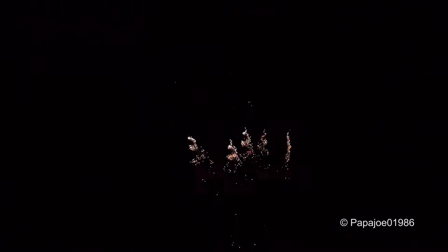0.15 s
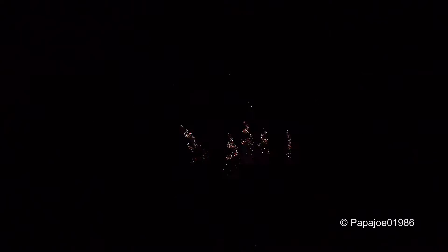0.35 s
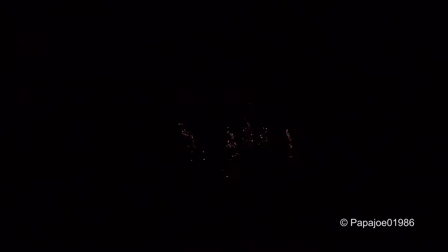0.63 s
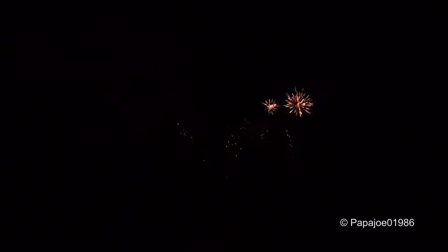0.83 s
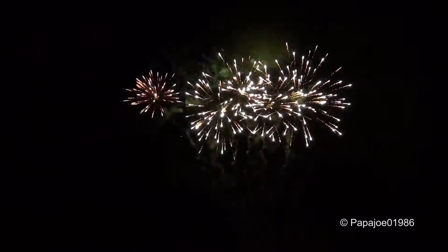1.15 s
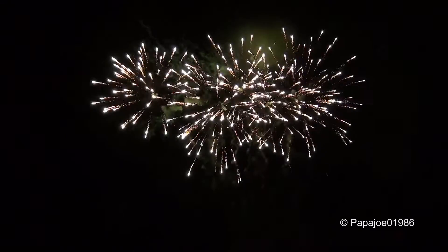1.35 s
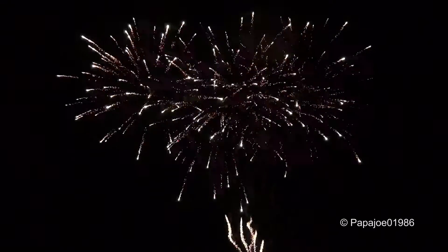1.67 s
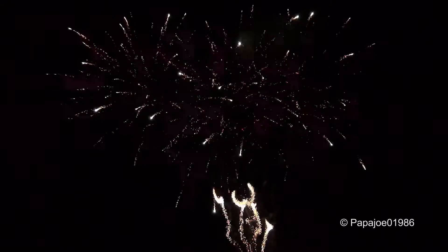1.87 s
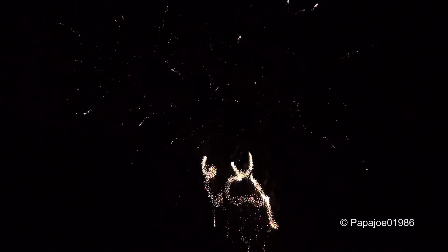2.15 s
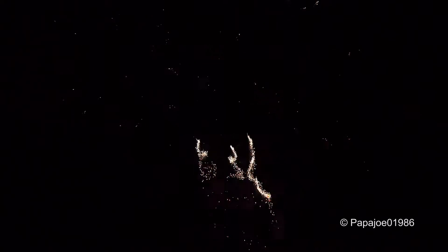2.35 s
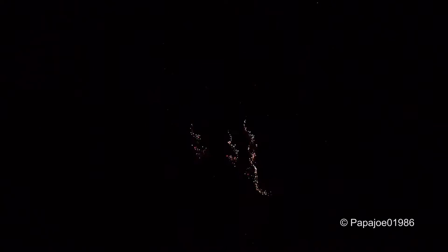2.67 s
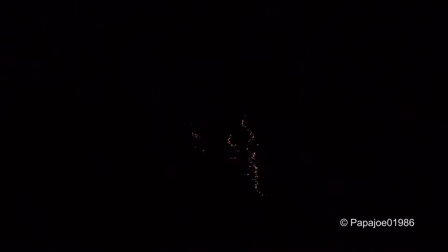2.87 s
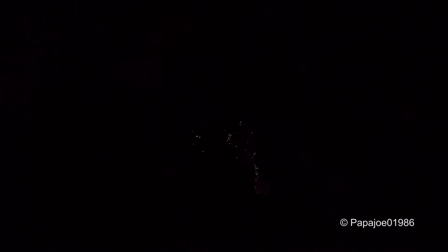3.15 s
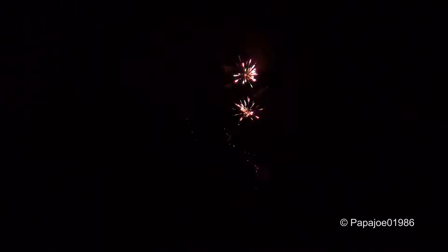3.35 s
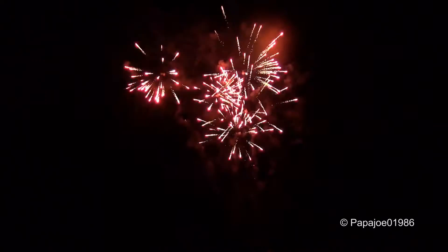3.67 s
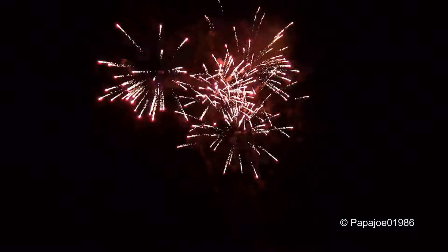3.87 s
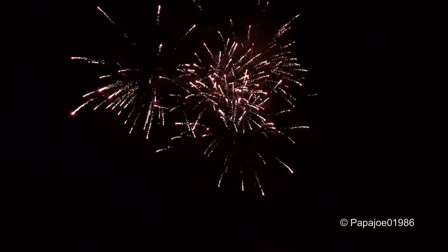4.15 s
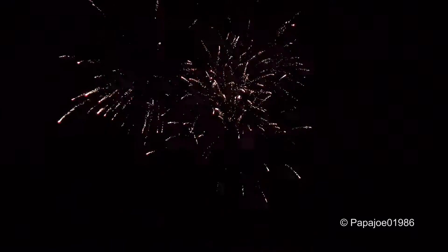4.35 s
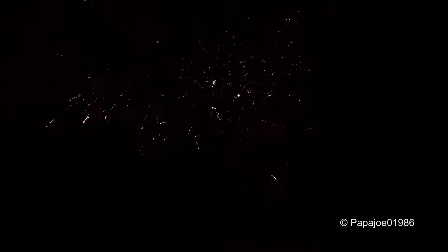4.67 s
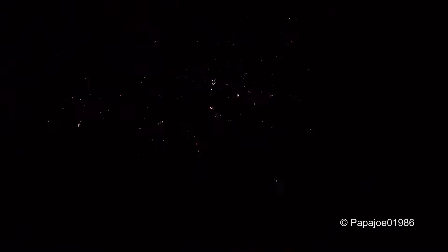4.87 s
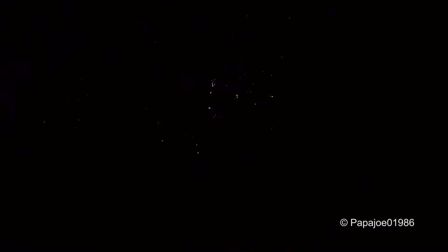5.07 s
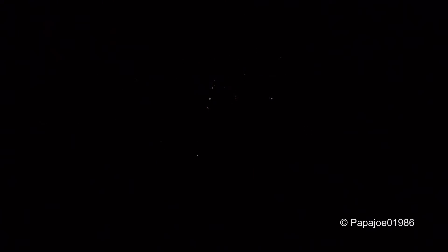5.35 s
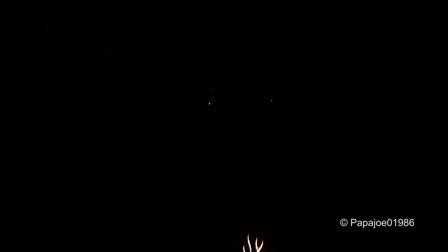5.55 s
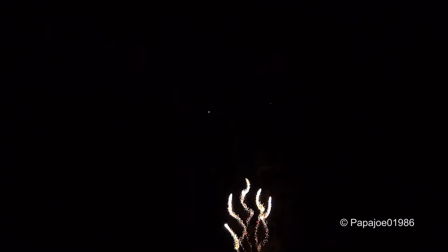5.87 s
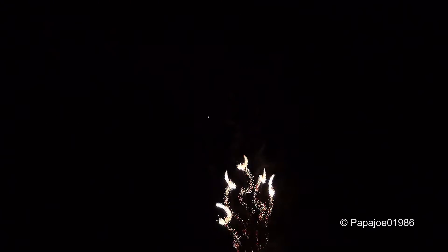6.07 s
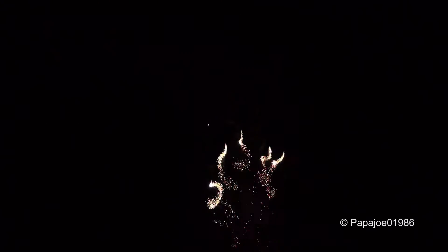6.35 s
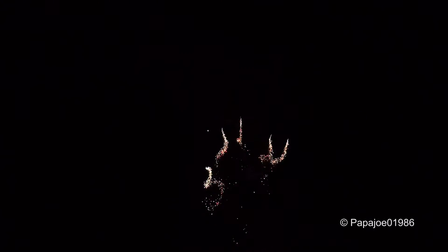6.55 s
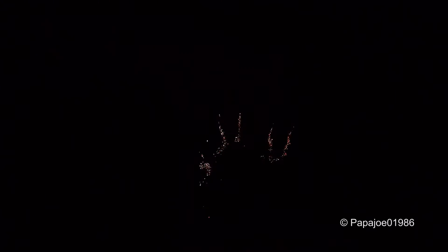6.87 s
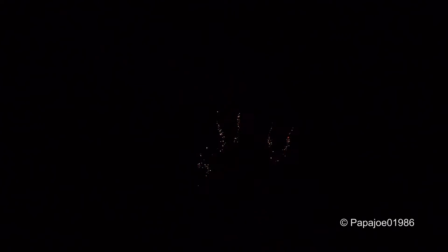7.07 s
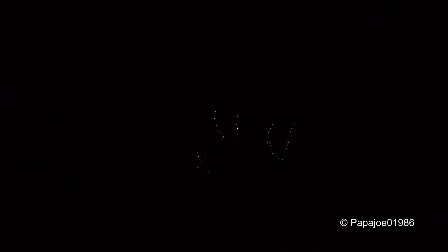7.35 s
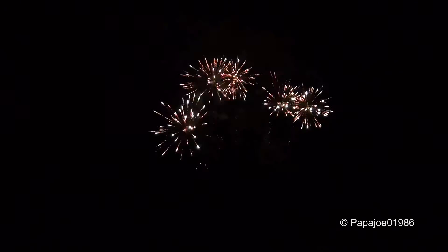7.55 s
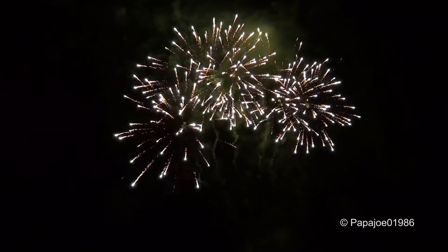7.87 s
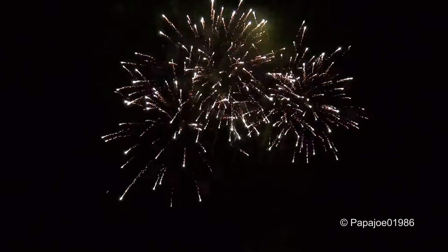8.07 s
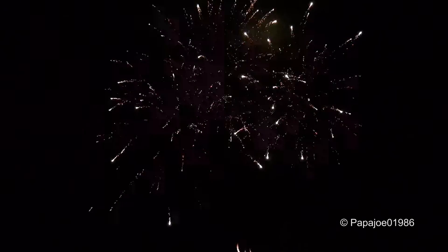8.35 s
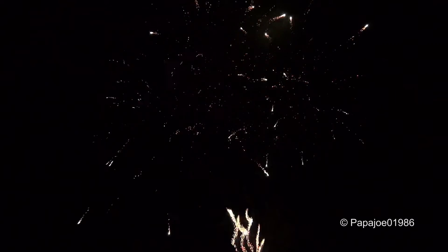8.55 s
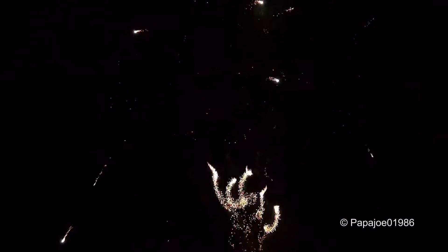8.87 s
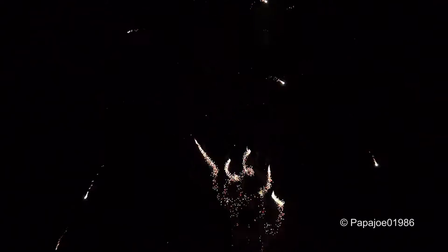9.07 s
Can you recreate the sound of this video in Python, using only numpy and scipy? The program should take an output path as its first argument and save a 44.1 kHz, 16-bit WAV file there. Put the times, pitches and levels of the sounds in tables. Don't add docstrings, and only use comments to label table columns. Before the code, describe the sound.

Outdoors among houses at night, wind rumbles on a single microphone while an earlier volley's echoes fade. Five shells crack in a tight cluster, quick launch thumps follow, then another burst volley, more thumps, a third set of bangs and final thumps. Each rolls back as roar, dull pops and hiss, with small debris ticks; the loud shots overload and briefly duck the background.

```python
import sys
import numpy as np
from scipy import signal
from scipy.io import wavfile
from scipy.ndimage import uniform_filter1d

SR = 44100
rng = np.random.default_rng(int(sys.argv[2]) if len(sys.argv) > 2 else 0)


def attenuation_scalar(level_db):
    decades = np.asarray(level_db, float) / 20
    return 10 ** decades


def wav_out(sig):
    wavfile.write(sys.argv[1], SR, np.round(np.clip(np.atleast_2d(sig).T, -1, 1) * 32767).astype(np.int16))


N = 406161
TIME = np.arange(N) / SR

# start_s [s], overdrive_db [dB], ground_bounce_ms [ms]
BURSTS = [(1.2315, 9, 4.5), (1.2328, 13, 4.4), (1.2936, 14, 4.4), (1.3118, 12, 4.7), (1.4095, 13, 4.7),
          (3.6742, 14, 5.2), (3.7089, 14, 4.4), (3.8065, 0, .4), (3.8454, 12, 5.1), (3.8776, 14, 3.6),
          (3.8824, 7, 2.8), (7.7638, 14, 4.0), (7.8189, 15, 4.8), (7.8458, 11, 4.9), (7.8507, 11, 4.4)]
# start_s [s], overdrive_db [dB], crack_db [dB]
LIFTS = [(1.7173, 1, -12), (1.7403, -3, -24), (1.7647, -1, -17), (1.7821, -2, -22), (1.8131, -2, -20),
         (5.7304, -2, -19), (5.7474, -2, -19), (5.7642, -1, -14), (5.7855, -1, -22), (5.8110, -2, -18),
         (8.5781, 0, -10), (8.5978, 0, -14), (8.6174, 1, -6), (8.6434, 1, -6), (8.6596, -1, -10)]


def unit(x):
    return x / np.sqrt(np.mean(x ** 2) + 1e-20)


def drift(rate):
    pole = np.exp(-2 * np.pi * 20 * rate / SR)
    noise = rng.standard_normal(N // 20 + 3002)
    slow = signal.lfilter([1], [1, -2 * pole, pole * pole], noise)[3000:]
    return np.interp(np.arange(N) / 20, np.arange(len(slow)), unit(slow))


def band(x, low_hz, high_hz):
    sos = signal.butter(2, [low_hz, min(high_hz, .45 * SR)], "band", fs=SR, output="sos")
    return signal.sosfilt(sos, x)


def bank(spectrum, source, patchy_db, rate):
    hz, db = np.transpose([point for point in spectrum if point[1] > -55])
    edges = hz[0] * 2 ** np.arange(0, np.log2(hz[-1] / hz[0]) + .2, 1 / 3)
    out = 0
    for k, (low, high) in enumerate(zip(edges, edges[1:])):
        level_db = np.interp(np.log(low * high) / 2, np.log(hz), db)
        flicker = 3.5 + patchy_db / 9 * drift(rate)
        out = out + attenuation_scalar(level_db) * flicker * band(source[k % 2], low, high)
    return unit(out)


def scatter(per_s, spread_db, smooth):
    clicks = (rng.random((2, N)) < per_s / SR) * rng.choice([-1, 1], (2, N))
    sizes = attenuation_scalar(spread_db * np.minimum(rng.exponential(1, (2, N)), 4))
    return unit(clicks * sizes) + smooth * rng.standard_normal((2, N))


def add(out, s, pulse):
    i = round(s * SR)
    out[i:i + len(pulse)] += pulse[:N - i]


def shock(swing_hz, decay_s, lead):
    t = TIME[:1400]
    return -np.cos(2 * np.pi * swing_hz * t + lead) * np.exp(-t / decay_s)


def roll(t):
    # start_s [s], level_db [dB]
    roar_tables = [
        [(0, -33.5), (.3, -32), (.52, -41), (.68, -38.5), (1.07, -43.5), (1.228, -39)],
        [(1.24, -21.5), (1.4, -20.5), (1.62, -26), (1.9, -26.5), (2.25, -24.5), (2.4, -26.5), (3.1, -25),
         (3.25, -31.5), (3.67, -34.5)],
        [(3.69, -26), (3.73, -19), (4.02, -17.5), (4.07, -23), (4.27, -26), (4.65, -21.5), (4.78, -24.5),
         (5.2, -28), (5.725, -31.5)],
        [(5.74, -31), (5.93, -45.5), (6.08, -37.5), (6.3, -33), (6.76, -33.5), (7.03, -40), (7.3, -38.5),
         (7.55, -39), (7.76, -45.5)],
        [(7.772, -33), (7.81, -18.5), (7.93, -17.5), (8.1, -28), (8.3, -27.5), (8.52, -26.5), (8.82, -26.5),
         (9.0, -32), (9.21, -24.5)],
    ]
    last_shot_s = np.array([-.65, 1.41, 3.88, 5.81, 7.85])
    s, db = np.transpose(sum(map(list, roar_tables), []))
    volley = np.searchsorted([rows[0][0] for rows in roar_tables], t, "right") - 1
    return np.interp(t, s, db), np.maximum(t - last_shot_s[volley], 0), volley


def levels():
    # start_s [s], level_db [dB]
    gust_levels = [(0.0, -5), (0.1, -9.5), (1.2, -10.5), (1.33, -18), (2.49, -13.5), (3.23, -10.5),
                   (3.39, -9), (3.9, -14.5), (4.1, -10.5), (4.21, -13.5), (6.64, -7.5), (6.69, -9.5),
                   (6.8, -13), (7.67, -3.5), (7.77, -5), (8.03, -7.5), (9.11, -9), (9.21, -12)]
    # fresh_db [dB], loss_db_per_s [dB/s]
    absorption = [
        (-6.5, 5),
        (-10.5, 22),
    ]
    # loudest_s [s], spark_db [dB], swell_db_per_s [dB/s]
    comet_tails = [(0, -41, 30.), (.28, -48.5, 49), (2.36, -35.5, 39), (6.1, -41.5, 68), (6.31, -33.5, 72),
                   (6.76, -45, 58), (8.96, -34.5, 147), (9.1, -36.5, 60.)]
    boom_db, boom_loss_db_per_s = np.array([-34.5, -15, -15.5, -24, -15]), 11.5
    flash_db, flash_s = [-14.5, -23, -30.5, -36.5], 0.031
    burn_out_db_per_s = 47.5

    t = TIME[::32]
    roar_db, age_s, volley = roll(t)
    over_db = roar_db + 21
    wind_gain = attenuation_scalar(np.interp(t, *np.transpose(gust_levels)) + 2 - 1.1 * np.maximum(over_db, 0))
    boom_power = attenuation_scalar(boom_db[volley] - boom_loss_db_per_s * age_s + 0.19 * over_db) ** 2
    sizzle_power, spark_power = [attenuation_scalar(roar_db + db - loss * age_s) ** 2 for db, loss in absorption]
    flash = np.max([(t > s) * np.exp(-np.abs(t - s) / flash_s) for s, _, _ in LIFTS], axis=0)
    comet_power = 0
    for s, db, swell in comet_tails:
        fall_db = np.maximum(swell * (s - t), burn_out_db_per_s * (t - s))
        comet_power = comet_power + attenuation_scalar(db - fall_db) ** 2
    power = [boom_power + (attenuation_scalar(-25) * wind_gain) ** 2,
             attenuation_scalar(roar_db) ** 2,
             sizzle_power + attenuation_scalar(0.5) ** 2 * comet_power,
             spark_power + comet_power + attenuation_scalar(-70) ** 2]
    echo = [np.sqrt(p + attenuation_scalar(db) ** 2 * flash) for p, db in zip(power, flash_db)]
    air_gain = attenuation_scalar(-54.5) * (echo[3] / attenuation_scalar(-35.5)) ** 1.6
    return [np.interp(TIME, t, gain) for gain in (wind_gain, *echo, air_gain)]


def wind():
    # pitch_hz [Hz], level_db [dB per Hz]
    wind_spectrum = [(7.1, -39), (12, 0), (38, 2.5), (140, -10), (225, -19), (298, -56.5), (357, -62),
                     (420, -53), (550, -57), (920, -120)]
    rumble = bank(wind_spectrum, rng.standard_normal((2, N)), patchy_db=5.0, rate=1.8)
    return rumble / np.sqrt(uniform_filter1d(rumble ** 2, size=4000) + .1) ** .5


def boom(lumps, echoes):
    # pitch_hz [Hz], level_db [dB per Hz]
    boom_spectrum = [(100, -40), (170, 2), (286, 2.5), (382, -4), (470, -12.5), (610, -26.5), (1030, -120)]
    return attenuation_scalar(0.32 * lumps) * bank(boom_spectrum, echoes, patchy_db=5.5, rate=10.0)


def roar(lumps, echoes):
    # pitch_hz [Hz], level_db [dB per Hz]
    roar_spectrum = [(250, -48.5), (430, -7), (521, 5), (579, -1.5), (774, -3), (1140, -2), (1600, -12.5),
                     (2080, -9.5), (3520, -120)]
    # pitch_hz [Hz], width_hz [Hz], level_db [dB]
    railing_bands = [
        (966, 210, -16.5),
        (2002, 250, -16),
    ]
    out = attenuation_scalar(1.6 * lumps) * bank(roar_spectrum, echoes, patchy_db=1.4, rate=25)
    for hz, width, db in railing_bands:
        out = out + attenuation_scalar(db) * unit(band(echoes[1], hz - width / 2, hz + width / 2))
    return out


def hiss(lumps):
    # pitch_hz [Hz], level_db [dB per Hz]
    sizzle_spectrum = [(1400, -5), (1700, -12), (2500, -6.5), (3400, -8.5), (4000, -21)]
    # pitch_hz [Hz], level_db [dB per Hz]
    spark_spectrum = [(3500, 4.5), (4000, -2), (4800, 2), (5600, -6.5), (7000, -23), (8500, -18.5)]
    # pitch_hz [Hz], level_db [dB per Hz]
    air_spectrum = [(6500, 2), (7500, -5), (9000, -12), (12000, -36.5), (16000, -25.5)]
    sparks = scatter(4000., 3.5, 0.67)
    sizzle = attenuation_scalar(2.5 * lumps) * bank(sizzle_spectrum, sparks, patchy_db=-2.0, rate=27.0)
    spark = attenuation_scalar(1.3 * lumps) * bank(spark_spectrum, sparks, patchy_db=1.1, rate=25)
    air = attenuation_scalar(1.1 * lumps) * bank(air_spectrum, scatter(1200., 3.0, .7), patchy_db=-2.5, rate=25.)
    return sizzle, spark, air


def field():
    lumps, echoes = drift(24), scatter(1500., 6.45, 1.0)
    layers = (wind(), boom(lumps, echoes), roar(lumps, echoes), *hiss(lumps))
    gusts, *echo = [unit(x) * gain for x, gain in zip(layers, levels())]
    return .85 * np.tanh(gusts / .85) + sum(echo)


def ducking():
    dip_db = np.zeros(N)
    for s, db, _ in BURSTS + LIFTS:
        depth_db = 10 * attenuation_scalar(.5 * (db - 14))
        add(dip_db, s + .001, depth_db * np.exp(-TIME[:12000] / .022))
    return attenuation_scalar(-np.minimum(dip_db, 16))


def whistles():
    # start_s [s], length_s [s], pitch_hz [Hz], sink_hz_per_s [Hz/s], level_db [dB]
    railing_tones = [(0, 0.41, 989, 133, -38.5), (.985, 0.052, 3120, 3000., -50),
                     (2.05, 0.38, 998, 178, -37), (2.94, 0.46, 989, 201, -35),
                     (6.68, 0.28, 1655, 1890, -42.5), (6.72, 0.46, 1172, 61.6, -41.5),
                     (7.277, .05, 1076, 100., -25.5), (7.203, .37, 1127, 151.5, -40.5)]
    swell_share, end_loss_db = 0.11, 2
    out, broken, waver = np.zeros(N), drift(40) + 1.3, 1 + .014 * drift(35)
    for start, length, top_hz, sink, top_db in railing_tones:
        s = start + length * np.array([0, swell_share, 1])
        hz = top_hz - sink * (s - start)
        db = top_db - end_loss_db * np.array([1, 0, 1])
        on = slice(round(s[0] * SR), round(s[-1] * SR))
        t = TIME[on]
        phase = 2 * np.pi * np.cumsum(np.interp(t, s, hz) * waver[on]) / SR
        fade = np.clip(np.minimum(t - s[0], s[-1] - t) / 0.013, 0, 1)
        out[on] += fade * attenuation_scalar(np.interp(t, s, db)) * np.sin(phase)
    return out * broken


def ticks():
    # start_s [s], peak_db [dB]
    debris = [(0.529, -30.5), (0.736, -33), (.7961, -34.5), (.9357, -35), (0.976, -35), (1.0201, -33),
              (2.9608, -17.5), (3.2744, -32.5), (3.347, -33), (3.451, -18), (3.471, -28.5), (3.491, -31),
              (3.5349, -27.5), (4.1629, -32), (4.325, -14.5), (4.374, -19), (4.362, -24), (4.6894, -32),
              (4.989, -30), (5.302, -40), (5.3836, -33), (5.4136, -30), (5.427, -31), (5.5593, -32),
              (7.069, -16), (7.3045, -30), (7.34, -22.5), (7.4931, -30), (7.5203, -27), (7.6271, -34)]
    specks_per_s, speck_db = 26, -49
    out, t = np.zeros(N), TIME[:1800]
    chances = rng.random((round(specks_per_s * N / SR), 2))
    impacts = debris + [(N / SR * u, speck_db + 12 * v ** 2) for u, v in chances]
    snaps = unit(band(rng.standard_normal((len(impacts), 1800)), 2600.0, 5930.0))
    for (s, db), snap in zip(impacts, snaps):
        noise = rng.standard_normal(1800)
        scrap_hz = 3560 * (1 + 0.052 * rng.exponential())
        click = unit(band(noise, .8 * scrap_hz, 1.25 * scrap_hz)) + .6 * snap + .2 * noise
        add(out, s, attenuation_scalar(db - 3 - 60 * t / .011) * click)
    grit = (rng.random(N) < 70 / SR) * attenuation_scalar(-43 + 5 * rng.standard_normal(N))
    return out + band(grit, 3000., 8000.)


def knocks():
    per_s, over_roar_db = 40, 8.5
    sizes = attenuation_scalar(over_roar_db + roll(TIME)[0] + 3.6 * rng.standard_normal(N))
    hits = (rng.random(N) < per_s / SR) * sizes
    return band(signal.fftconvolve(hits, shock(500., 0.00079, 0))[:N], 450.0, 3000.)


def pops():
    # start_s [s], peak_db [dB], ring_hz
    # [Hz]
    wall_echoes = [(.08, -19.5, 760), (.113, -18, 760), (0.207, -18, 533), (.339, -10.5, 497),
                   (1.369, -10, 493), (1.503, -9, 600), (1.946, -13, 706), (2.31, -9.5, 473),
                   (2.53, -1.5, 550), (2.544, -9, 510), (2.592, -7.5, 510), (2.707, -5.5, 670),
                   (2.719, -8, 520), (2.873, -10, 660), (3.023, -8, 490), (3.073, -10.5, 540),
                   (4.361, -5, 730), (4.504, -5, 506), (4.687, -3, 625), (4.723, -6.5, 676),
                   (4.756, -7, 590), (5.081, -2.5, 670), (5.096, -3.5, 600), (5.105, -1.5, 570),
                   (5.258, -3, 610), (5.276, -11, 640), (5.3, -5.5, 604), (5.308, -5.5, 640),
                   (5.332, -7, 656), (9.189, -6, 653),
                   (.147, -20, 985), (2.003, -10, 1080), (2.054, -11, 940), (2.126, -7.5, 970),
                   (2.14, -11, 1010), (2.188, -19, 606), (2.472, -14, 560), (2.947, -23, 956),
                   (4.374, -17, 716), (5.022, -15, 900), (5.585, -13.5, 470), (7.278, -34, 1730),
                   (7.458, -27, 1800), (7.498, -32, 1810), (7.534, -29, 1800), (8.255, -9, 900),
                   (9.13, -15, 616), (9.15, -15, 1120), (9.17, -4.5, 830), (9.179, -11, 850)]
    early_lifts_s, early_lift_db = [-.73, -.698, -.677, -.655, -.632], -7
    far_wall_s, far_wall_db, far_wall_hz = 1.3815, -12.5, 574
    overtone_loss_db_per_s = 22.5

    out, t = np.zeros(N), TIME[:1800]
    front = band(shock(700., 0.0011, 0), 650., 3200.)
    swell = t / 0.0027 * np.exp(1 - t / 0.0018)
    shots = [(s, early_lift_db) for s in early_lifts_s] + [(s, db) for s, db, _ in LIFTS[:10]]
    returns = [(s + far_wall_s, db + far_wall_db, far_wall_hz * rng.uniform(.93, 1.12)) for s, db in shots]
    for s, db, hz in wall_echoes + returns:
        overtone_db = min(-overtone_loss_db_per_s * roll(s)[1], -6) - 2.5
        ring = np.sin(2 * np.pi * hz * t * (1 - 2.67 * t) + rng.uniform(0, 2 * np.pi))
        if hz < 800:
            ring = ring + attenuation_scalar(-12.5) * np.sin(2 * np.pi * 2.1 * hz * t)
        rough = unit(band(rng.standard_normal(1800), 1400.0, 2540.0))
        add(out, s, attenuation_scalar(db + 2.5) * swell * (ring + attenuation_scalar(overtone_db) * rough))
        add(out, s, attenuation_scalar(db - 5.5) * front)
    return out


def lifts():
    out, t = np.zeros(N), TIME[:1400]
    muzzle = band(1.4 * shock(800, .00065, -.5), 30, 5500)
    push = shock(275, .0024, np.pi / 2)
    slap = band(muzzle, 900., 1600.0)
    for k, (s, db, crack_db) in enumerate(LIFTS):
        port_ring = unit(band(rng.standard_normal(1400), 3500.0, 5320.0)) * np.exp(-t / 0.0011)
        crack = band(rng.standard_normal(1400), 6000., 15000.) * np.exp(-t / 0.00054)
        add(out, s, attenuation_scalar(db) * muzzle)
        add(out, s + 0.00127, attenuation_scalar(db + 1.5) * push)
        add(out, s + 0.00016, attenuation_scalar(crack_db + 2.5) * port_ring)
        add(out, s + 0.00013, attenuation_scalar(crack_db - 3.5) * crack)
        add(out, s + .5106, attenuation_scalar(db - 6.5 - 1.2 * (k % 5)) * slap)
    return out


def bursts():
    out, t = np.zeros(N), TIME[:1400]
    direct, bounce = shock(290, .00095, .75), shock(310, .0008, .7)
    for s, db, bounce_ms in BURSTS:
        wake = band(rng.standard_normal(1400), 500, 5500) * np.exp(-t / .005)
        tail = band(rng.standard_normal(8000), 4000., 10000.) * np.exp(-TIME[:8000] / 0.082)
        add(out, s, attenuation_scalar(db + 11) * direct)
        add(out, s + bounce_ms / 1000, attenuation_scalar(db + 5) * bounce)
        add(out, s + .002, attenuation_scalar(db - 28) * wake)
        add(out, s, attenuation_scalar(db - 57) * tail)
    return out


def scene():
    steady = ducking() * field() + pops() + knocks() + ticks() + whistles()
    mono = steady + bursts() + lifts()
    return np.array([mono, mono])


def low_pass(x):
    return signal.sosfilt(signal.butter(12, 16510, fs=SR, output="sos"), x)


def record(dry):
    # pitch_hz [Hz], level_db [dB rms]
    whine_lines = [(15525, -83), (15575, -69), (15625, -74.5), (15675, -75), (15725, -84.5)]
    x = np.clip(dry[0], -.94, .94)
    x = signal.sosfilt(signal.butter(1, 12., "high", fs=SR, output="sos"), x)
    x = x + attenuation_scalar(-70.5) * unit(band(rng.standard_normal(N), 5000., 15000.0))
    x = x + sum(attenuation_scalar(db + 3) * np.sin(2 * np.pi * hz * TIME) for hz, db in whine_lines)
    x = x + attenuation_scalar(-66.5) * unit(band(rng.standard_normal(N), 15450., 15800.))
    side = attenuation_scalar(-40) * (x + np.abs(x) * rng.standard_normal(N) * .03)
    top_cut = signal.cheby2(10, 50, 16400, fs=SR, output="sos")
    mix = signal.sosfilt(top_cut, [x - side, x + side])
    return low_pass(np.clip(mix, -1, 1))


dry = scene()
out = record(dry)
wav_out(out)
```